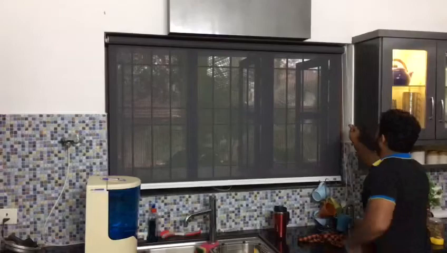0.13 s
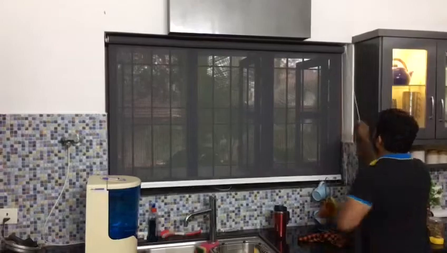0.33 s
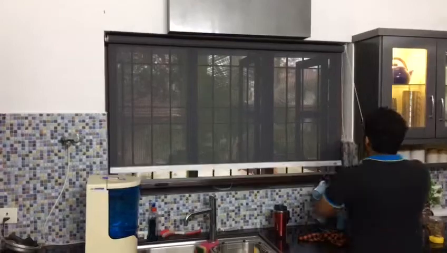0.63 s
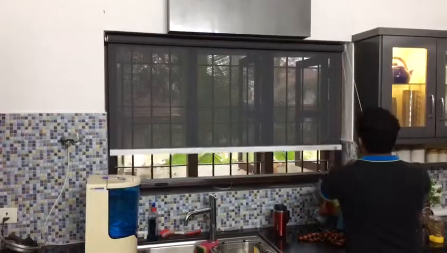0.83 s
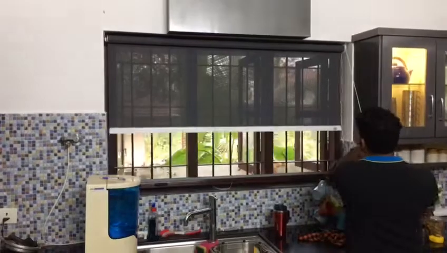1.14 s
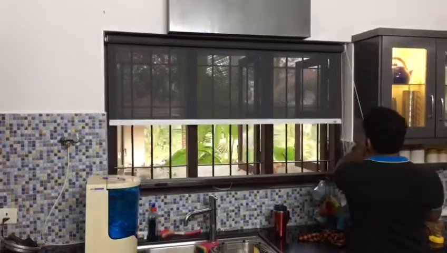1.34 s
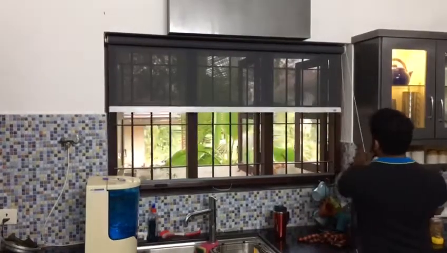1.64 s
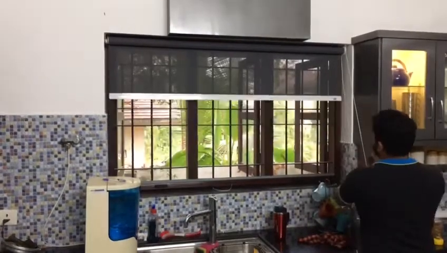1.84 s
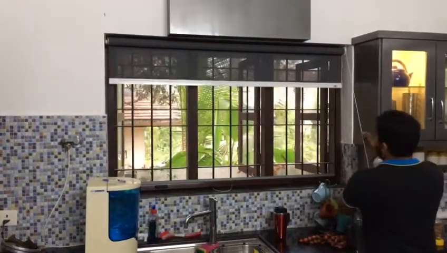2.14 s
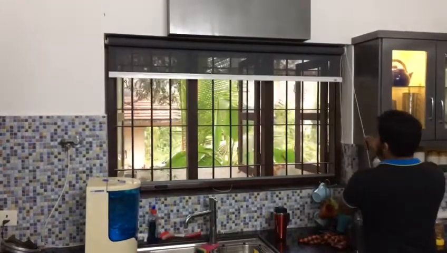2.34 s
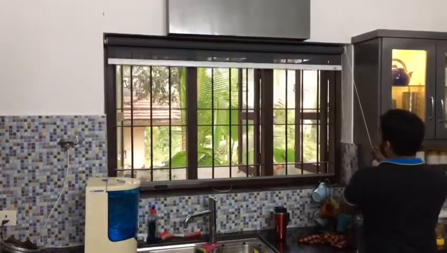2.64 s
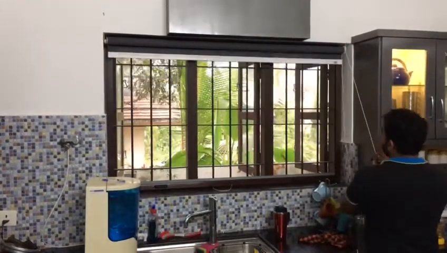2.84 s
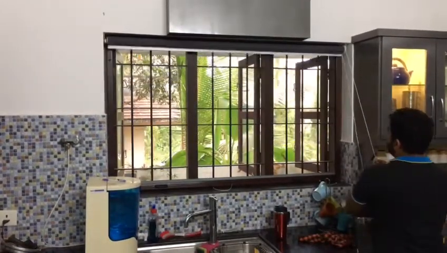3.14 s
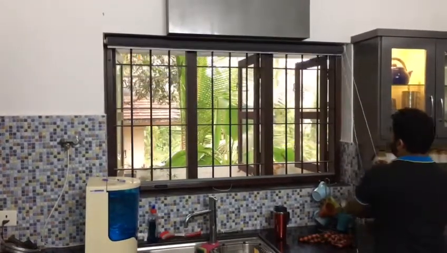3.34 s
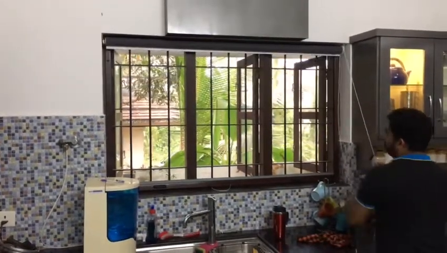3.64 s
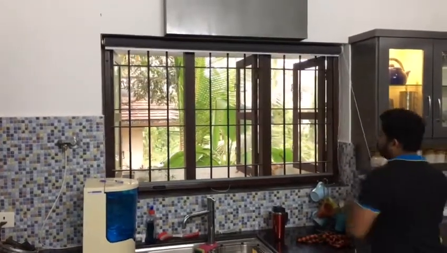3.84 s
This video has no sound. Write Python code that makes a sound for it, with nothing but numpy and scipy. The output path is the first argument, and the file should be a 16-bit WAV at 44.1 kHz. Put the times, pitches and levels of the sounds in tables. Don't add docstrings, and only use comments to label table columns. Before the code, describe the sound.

A roller blind goes up in a hard-walled kitchen: bead chain rattles over tiles, the tube rumbles with each pull, the bar knocks loudly at the top, then the chain drops, heard by a phone across the room.

```python
import sys
import numpy as np
from scipy import signal
from scipy.fft import rfft, irfft
from scipy.io import wavfile
from scipy.ndimage import uniform_filter1d

SR = 44100
rng = np.random.default_rng(int(sys.argv[2]) if len(sys.argv) > 2 else 0)


def generate_wav(sig):
    pcm = np.round(np.clip(np.atleast_2d(sig).T, -1, 1) * 32767).astype(np.int16)
    wavfile.write(sys.argv[1], SR, pcm)


def ratio_of_db(decibels):
    return 10 ** (np.asarray(decibels, float) / 20)


N = 176400
HZ = np.fft.rfftfreq(2 * N, 1 / SR)


def level(x, db, seconds=N / SR):
    return x * ratio_of_db(db) / np.sqrt(np.sum(x ** 2) / (seconds * SR))


def shape(x, gain):
    cepstrum = irfft(np.log(gain + 1e-6))
    cepstrum[1:N] *= 2
    cepstrum[N + 1:] = 0
    return irfft(rfft(x, 2 * N) * np.exp(rfft(cepstrum)))[:N]


def tone(points, skirt_db=-30):
    hz, db = np.array(points, float).T
    octaves = np.log2(HZ + 1)
    below = np.clip(np.log2(hz[0]) - octaves, 0, 4)
    return ratio_of_db(np.interp(octaves, np.log2(hz), db) + skirt_db * below)


def bump(hz, width_hz):
    return 1 / np.sqrt(1 + ((HZ - hz ** 2 / (HZ + 1)) / width_hz) ** 2)


def walk(rate_hz):
    k = int(SR / rate_hz)
    steps = np.repeat(rng.standard_normal(N // k + 1), k)
    wander = uniform_filter1d(uniform_filter1d(steps, k), k)[:N]
    return wander / wander.std()


def clicks(start_s, length_s, rate_hz, scatter_db=2.5, fade_s=0.004):
    u = rng.random((3, 600))
    when = np.cumsum(-np.log(1 - u[0])) / rate_hz
    when -= when[0]
    size = ratio_of_db(-scatter_db * np.log(1 - u[1])) * np.sign(u[2] - 0.5)
    size *= np.clip((length_s - when) / fade_s, 0, 1)
    x = np.zeros(N)
    np.add.at(x, np.minimum(((start_s + when) * SR).astype(int), N - 1), size)
    return x / np.sqrt(np.sum(x ** 2))


def rings(x, modes):
    t = np.arange(SR) / SR
    out = 0
    for hz, db, t60_s in modes:
        phase_a, phase_b, detune = rng.random(3)
        pair = np.sin(2 * np.pi * (hz * t + phase_a))
        pair += 0.47 * np.sin(2 * np.pi * (hz * (1.002 + 0.0036 * detune) * t + phase_b))
        out = out + ratio_of_db(db - 60 * t / min(t60_s, 0.7)) * pair
    return signal.fftconvolve(x, out)[:N]


# pitch_hz, t60_s
ROOM_DECAY = [(300, 0.73), (1000, 0.69), (2000, 0.69), (4000, 0.65), (8000, 0.62), (12000, 0.33)]
BUILD_S = 0.0013


def room(x, direct_db=-9):
    t = np.arange(SR) / SR
    decay_hz, t60_s = np.array(ROOM_DECAY).T
    tail = np.zeros(SR)
    for hz in 250 * 2 ** np.arange(0, 6, 0.5):
        edges = [hz / 2 ** 0.25, hz * 2 ** 0.25]
        half_octave = signal.butter(2, edges, "band", fs=SR, output="sos")
        band = signal.sosfilt(half_octave, rng.standard_normal(SR))
        fall = ratio_of_db(-60 * t / np.interp(np.log(hz), np.log(decay_hz), t60_s))
        tail += band * fall / np.sqrt(np.mean(fall ** 2))
    tail *= 1 - np.exp(-t / BUILD_S)
    tail /= np.sqrt(np.sum(tail ** 2))
    tail[0] = ratio_of_db(direct_db)
    return signal.fftconvolve(x, tail)[:N]


# pitch_hz, level_db (per Hz)
HUM_TONE = [(100, -7.5), (280, -4), (450, -9.5), (1000, -9), (2200, -19.5), (4300, -29.5), (5200, -33.5),
            (11000, -44)]
# pitch_hz, width_hz, level_db
MOTOR_DRONES = [(55, 18, -61.5), (106.2, 12, -72.5), (206.6, 30, -62.5), (256.8, 42, -68),
                (301.74, 2.7, -60.5), (358.8, 19, -62.5)]
HUM_DB, SWELL_DB, FLICKER_DB = -49, 0.5, 0.8


def hum():
    def noise(gain):
        return irfft(rfft(rng.standard_normal(2 * N)) * gain)[:N]

    out, swell, colour = 0, walk(1.214), tone(HUM_TONE, skirt_db=-66)
    for hz in 90 * 2 ** np.arange(0, 7.2, 0.5):
        window = np.cos(np.pi / 2 * np.clip(2 * np.log2((HZ + 1) / hz), -1, 1))
        band = noise(colour * window)
        out = out + band * ratio_of_db(SWELL_DB * swell + FLICKER_DB * walk(8.926))
    drones = sum(level(noise(bump(hz, width_hz) ** 2), db) for hz, width_hz, db in MOTOR_DRONES)
    return level(out, HUM_DB) + drones


# start_s, level_db, pitch_hz
BEAD_TICKS = [(.3305, -78, 6000), (1.968, -72, 2500), (2.1858, -69, 8500), (2.602, -78, 11500),
              (2.8458, -80, 6000), (3.1122, -68, 5500), (3.1411, -72, 7000), (3.156, -67, 3500)]


def ticks():
    dry_ticks = np.zeros(N)
    for start_s, db, hz in BEAD_TICKS:
        tick = shape(clicks(start_s, 0.0052, 190), bump(hz, 0.8 * hz) ** 2)
        dry_ticks += level(tick, db, 0.02)
    return room(dry_ticks, direct_db=3)


# start_s, length_s, level_db, pitch_hz
TUBE_PULLS = [(0.571, 0.035, -56.5, 940), (0.848, 0.075, -56.5, 1460), (0.862, .05, -61, 950),
              (1.141, 0.0402, -52.5, 1020), (1.161, 0.055, -56.5, 1300), (1.63, 0.0374, -57, 982),
              (1.64, 0.045, -58, 1300), (1.958, 0.04, -53.5, 1020), (2.43, 0.076, -59, 1260),
              (3.106, 0.087, -51, 1000), (3.041, 0.17, -64, 2600)]


def tube():
    knocks_per_s, spread = 500, 0.35
    rumble = np.zeros(N)
    for start_s, length_s, db, hz in TUBE_PULLS:
        pull = shape(clicks(start_s, length_s, knocks_per_s), bump(hz, spread * hz) ** 2)
        rumble += level(pull, db, length_s)
    return room(rumble, direct_db=-2)


def chain(events, colour, modes=(), ring_db=0):
    hits = np.zeros(N)
    for start_s, length_s, db, beads_per_s in events:
        hits += ratio_of_db(db) * np.sqrt(length_s + 0.042) * clicks(start_s, length_s, beads_per_s)
    energy = np.sqrt(np.sum(hits ** 2))
    out = level(room(shape(hits, tone(colour))), 0, 0.88) * energy
    if modes:
        out = out + level(rings(hits, modes), ring_db, 0.12)
    return out


# start_s, length_s, level_db, rate_beads_per_s
CHAIN_SLIDES = [(.505, 0.017, -51.5, 4300), (.53, 0.13, -53.5, 3300), (.68, 0.16, -64.5, 2500),
                (.82, 0.032, -60, 2800), (.9, 0.321, -68, 1700), (1.55, .2, -70.5, 1500)]
# pitch_hz, level_db (per Hz)
SLIDING_TONE = [(1470, -41), (2500, -10), (4140, -2), (6430, 0.5), (7430, -7), (8700, -3), (12000, -12.5),
                (15600, -44), (22000, -120)]


def slides():
    return chain(CHAIN_SLIDES, SLIDING_TONE)


# start_s, length_s, level_db, rate_beads_per_s
CHAIN_SLAP = [
    (1.7735, 0.0072, -39.5, 9020),
    (1.778, 0.021, -40, 6070),
]
# pitch_hz, level_db (per Hz)
SLAPPING_TONE = [(2600, -15), (3100, -11), (3900, -11), (4600, -4), (5100, -7), (6200, -0.5), (8500, -8),
                 (12000, -6.5)]
# pitch_hz, level_db, t60_s
SLAP_MODES = [(4597, -3, 0.37), (6013, -17, 0.15), (7100, -21.5, .25), (9200, 2, 0.12)]


def slap():
    return chain(CHAIN_SLAP, SLAPPING_TONE, SLAP_MODES, ring_db=-54)


# start_s, length_s, level_db, rate_beads_per_s
CHAIN_DROP = [
    (3.7495, .009, -34.5, 8950),
    (3.766, 0.013, -37.5, 6990),
    (3.79, 0.094, -58, 3500),
    (3.912, 0.044, -49, 4000),
    (3.992, 0.0257, -48, 3000),
]
# pitch_hz, level_db (per Hz)
DROPPING_TONE = [(1350, -37), (2300, -10.5), (3170, -4), (3330, -3), (3620, -2.5), (9620, 1.5),
                 (11600, 2.5), (12200, -26), (15900, -47), (22000, -120)]
# pitch_hz, level_db, t60_s
DROP_MODES = [(3485, 1.5, 0.27), (4316, -4, 0.33), (5570, -9, 0.33), (6000, 0, 0.29), (6810, -2, .3),
              (9500, -1, .2), (10700, -14, .16)]


def drop():
    return chain(CHAIN_DROP, DROPPING_TONE, DROP_MODES, ring_db=-47)


# start_s, level_db
BAR_HITS = [
    (3.2115, 11.5),
    (3.2154, -12),
    (3.2205, -6),
    (3.234, -15),
]
# pitch_hz, level_db (per Hz)
BLOW_TONE = [(350, -28.5), (600, -11), (1000, -0.5), (1400, -4), (2350, -2.5), (3000, -16), (4250, -16.5),
             (11700, -38)]
# pitch_hz, level_db, t60_s
BAR_MODES = [(599, -7, 1), (855, -3, 0.9), (996, -3, 0.84), (1088, 7.5, 0.353), (1164, -8, .5),
             (1200, 0, 0.24), (1450, -8, .45), (1682, -8, 0.65), (1823, 5, 0.43), (1987, -4, 0.16),
             (2213, -1, 0.15), (2350, -3, 0.24), (2570, -6, 0.21), (4174, -4, 0.53)]
CRACK_T60_S, THUMP_S = 0.071, 0.11


def knock():
    hits = np.zeros(N)
    for start_s, db in BAR_HITS:
        hits[int(start_s * SR)] = ratio_of_db(db)
    thump = shape(clicks(BAR_HITS[0][0], THUMP_S, 300), bump(190, 280) ** 2)
    burst = rng.standard_normal(SR) * ratio_of_db(-60 * np.arange(SR) / SR / CRACK_T60_S)
    crack = shape(signal.fftconvolve(hits, burst)[:N], bump(4000, 2620))
    body = room(shape(hits, tone(BLOW_TONE)), direct_db=-9.5)
    out = level(body, -23, 0.11) + level(rings(hits, BAR_MODES), -26, 0.0566)
    return out + level(crack, -29, 0.015) + level(thump, -49.5, THUMP_S)


def scene():
    beads = slides() + slap() + drop()
    return (beads + ticks() + tube() + knock() + hum())[None]


def roll_off(x):
    return signal.sosfilt(signal.butter(12, 12600, fs=SR, output="sos"), x)


START_S = 0.0737
TOP_HZ, TOP_WIDTH_HZ, TOP_DB = 11850, 250, -40


def record(dry):
    slope = (TOP_HZ + 2 * TOP_WIDTH_HZ - HZ) / TOP_WIDTH_HZ * 2
    rolloff_db = TOP_DB / (1 + np.exp(np.clip(slope, -50, 50)))
    x = shape(dry[0], ratio_of_db(rolloff_db))[None]
    is_open = np.arange(N) >= START_S * SR
    return roll_off(x * is_open)


dry = scene()
out = record(dry)
generate_wav(out)
```